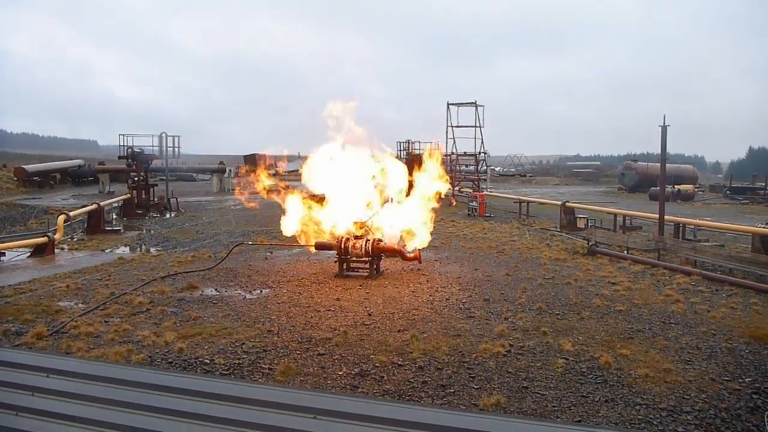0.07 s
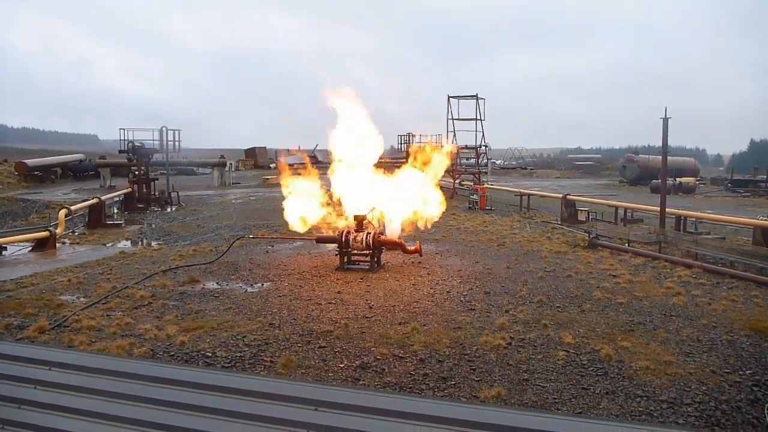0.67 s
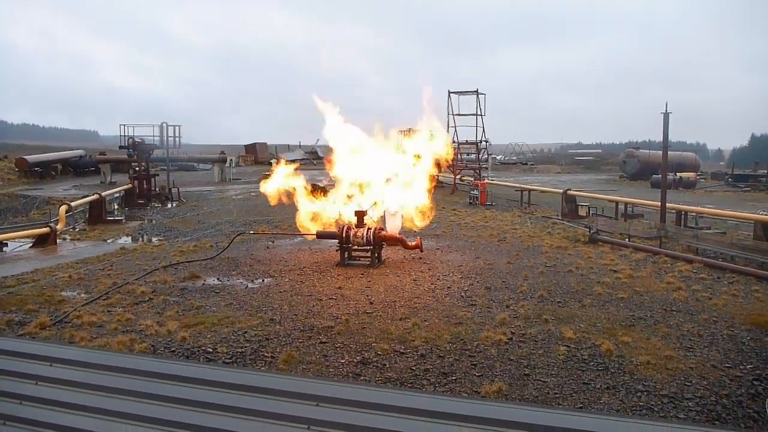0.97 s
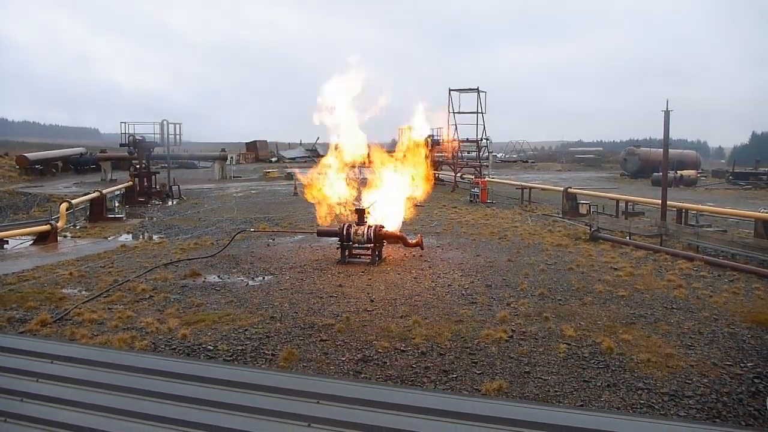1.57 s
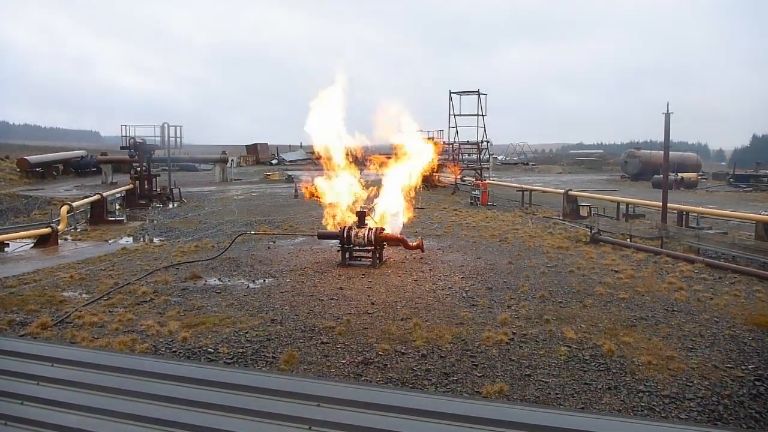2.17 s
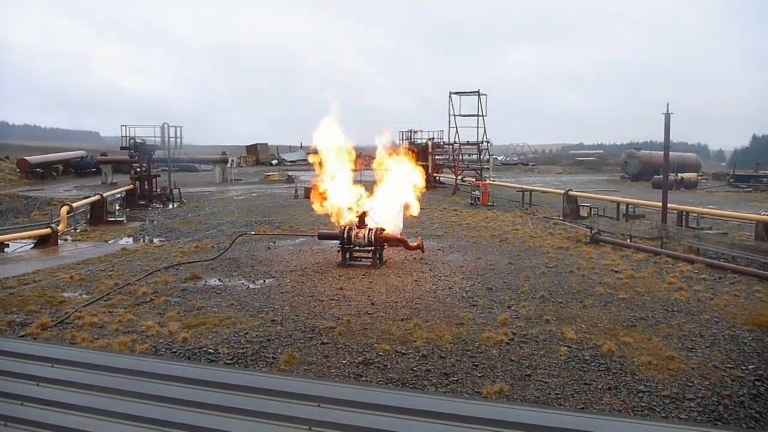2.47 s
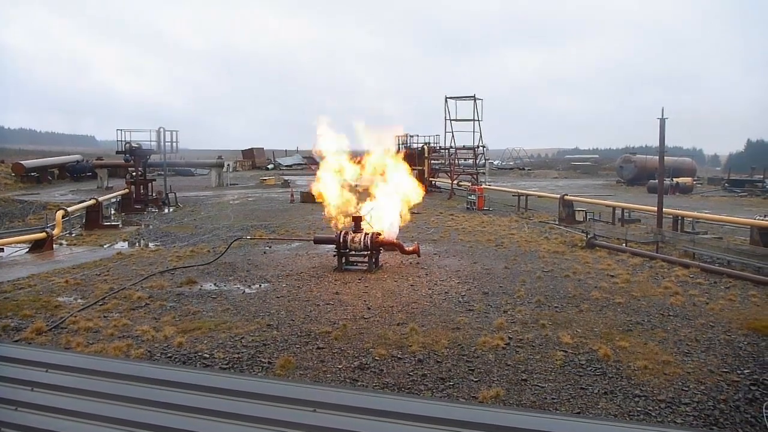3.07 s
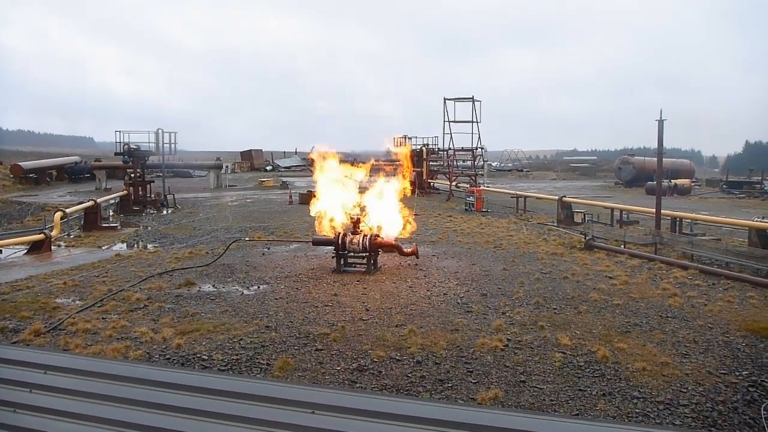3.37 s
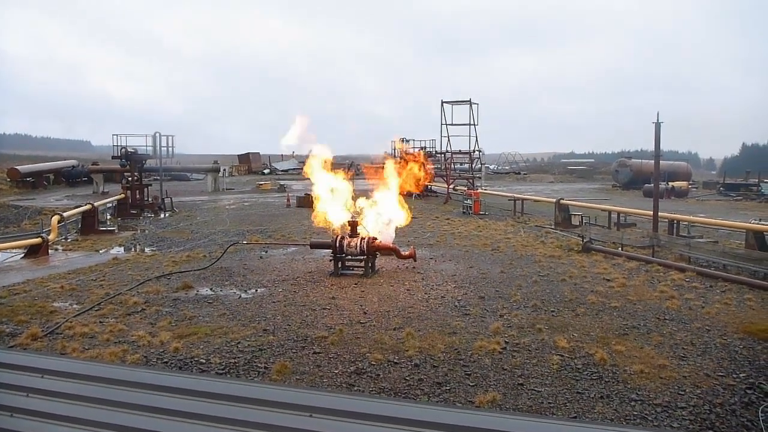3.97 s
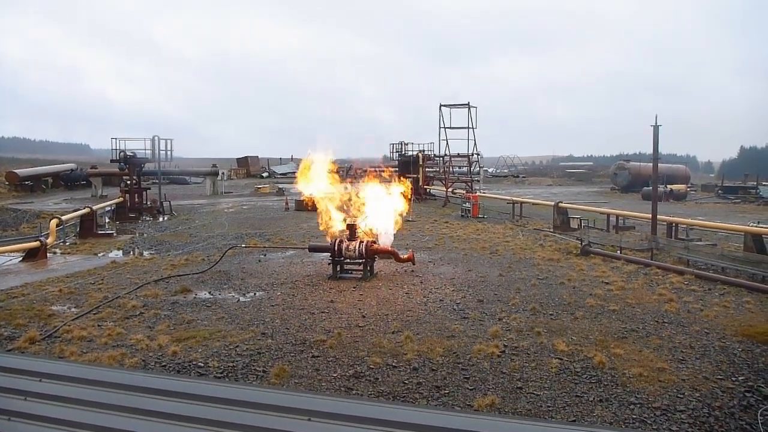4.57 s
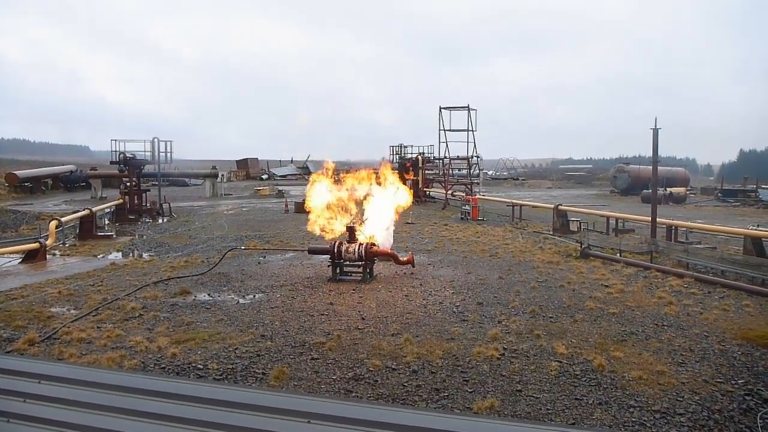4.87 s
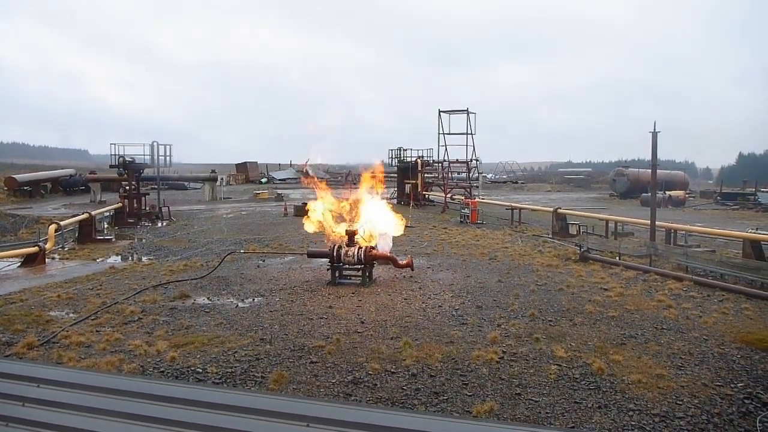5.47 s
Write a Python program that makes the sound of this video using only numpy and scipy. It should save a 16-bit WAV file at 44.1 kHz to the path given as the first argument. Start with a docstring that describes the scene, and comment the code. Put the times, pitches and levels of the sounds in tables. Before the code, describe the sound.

Burning gas jets from a pipe fitting with a fluttering roar and sputtering hiss that gradually weaken over a low rumble.

```python
"""Gas from a leaking pipe fitting hisses and burns in a tall flame in an open yard, over a low rumble.
The turbulent roar peaks in the first two seconds; gas pockets puff softly, the jet whistles briefly.
Then the pressure falls: the flame shrinks, its roar fades and sinks in pitch, the hiss weakens.
All is heard through the ringing housing of a small recorder that samples at 16 kHz."""
import sys
import numpy as np
from scipy import signal
from scipy.fft import rfft, irfft
from scipy.io import wavfile

SR = 44100
rng = np.random.default_rng(int(sys.argv[2]) if len(sys.argv) > 2 else 0)


def to_wav(s):
    """Save 16-bit WAV."""
    ch = np.atleast_2d(s).T  # columns
    pcm = np.round(np.clip(ch, -1, 1) * 32767)  # PCM
    wavfile.write(sys.argv[1], SR, pcm.astype(np.int16))


N = 242991
TIME_S = np.arange(N) / SR

# burn strength: (time [s], level [dB])
BURN = [(0.0, -35.5), (0.18, -30.5), (0.3, -29), (0.4, -33.5), (0.51, -29.5), (0.69, -33.5), (0.78, -28.5),
        (1.16, -29), (1.4, -33), (1.86, -30.5), (1.92, -34), (1.99, -30.5), (2.22, -35), (2.43, -41),
        (2.57, -37), (2.86, -42.5), (3.17, -40.5), (3.71, -46), (3.8, -42), (4.23, -43), (4.68, -48.5),
        (4.85, -45.5), (5.36, -46), (5.51, -51)]
# roar resonance: (time [s], centre [Hz])
ROAR_PITCH = [(0.0, 724), (0.47, 930), (0.66, 800), (0.79, 1000), (1.12, 790), (1.55, 845), (2.5, 700),
              (3.55, 710), (3.85, 616), (4.75, 760), (5.51, 700)]
# activity of the small flame tongues: (time [s], level [dB])
FLUTTER = [(0.0, -33.5), (0.43, -33), (0.66, -30), (0.73, -36), (0.97, -31), (1.46, -34.5), (1.5, -29),
           (1.75, -38.5), (1.97, -34.0), (2.87, -43.5), (3.34, -42.0), (3.69, -48), (3.87, -44),
           (4.15, -49.0), (4.21, -46), (5.25, -54), (5.34, -47.0), (5.51, -50)]
# gas flow at the leak: (time [s], level [dB])
FLOW = [(0.0, -35), (0.22, -34), (0.4, -36), (0.55, -33), (0.88, -33), (0.98, -31.5), (1.33, -34.5),
        (1.88, -36), (2.13, -36), (2.3, -38.5), (2.38, -41.5), (2.59, -38), (2.74, -42), (3.28, -41.7),
        (3.42, -44.5), (3.65, -45), (3.89, -41), (4.16, -44), (4.43, -44), (4.62, -46.5), (5.19, -46.8),
        (5.51, -46.5)]
# turbulence spectra: (frequency [Hz], density [dB])
ROAR_SPECTRUM = [(150, -52), (330, -22.5), (450, -2), (620, 1.5), (1000, -2), (1300, -8), (2000, -9),
                 (4000, -63)]
TONGUE_SPECTRUM = [(700, -76), (1100, -5.5), (1400, 2), (1550, 0.5), (1900, -5), (2400, -26.5), (4000, -35)]
RUSH_SPECTRUM = [(900, -3), (1700, -3), (2200, 2), (3500, 2), (4200, -1.5), (5200, -19), (7500, -39)]
HISS_SPECTRUM = [(2500, -36), (3800, -4), (4600, 2.5), (5100, 2), (6300, 0), (7000, -7), (7550, -24.5)]
RUMBLE_SPECTRUM = [(25, -49), (60, -31.5), (130, -15), (200, -8.5), (280, -3), (400, 0.5), (600, 1.5),
                   (1200, -58)]
# jet tones: (time [s], level [dB], pitch [Hz], 1/e half-width [s])
WHISTLES = [(0.63, -50, 2600, .02), (1.23, -43, 2630, .03), (1.413, -48, 2610, .008),
            (2.6, -60, 2600, .025), (2.785, -49, 3540, 0.011), (2.83, -47, 3500, .006),
            (4.72, -58.5, 5000, 0.07), (5.064, -59, 2600, .035), (5.223, -56, 5220, .02),
            (5.267, -54, 4320, .018), (5.372, -57, 2590, 0.056)]
# igniting gas pockets: (time [s], peak [dB], pitch [Hz], 1/e half-width [s])
PUFFS = [(.609, -42, 331, .003), (0.64, -41, 326, .003), (1.455, -42, 300, 0.0035),
         (4.125, -37.5, 335, 0.0027), (4.239, -32, 734, 0.0018), (4.705, -42, 300, 0.0028)]
# housing resonances and notches: (centre [Hz], width [Hz], gain [dB])
HOUSING = [(261, 44, 2.5), (615, 43, 4.5), (914, 324, 3), (1208, 203, -4), (1522, 55, 8.5), (1630, 119, 7),
           (2300, 260, -3), (2580, 108, 10.5), (2907, 91, -21), (3013, 134, 14), (3237, 63, 3.5),
           (3390, 78, -2), (3515, 136, 8), (3744, 83, 7.5), (4050, 52, 6.5), (4040, 106, -1),
           (4938, 276, 8), (5340, 96, -1.5), (5490, 230, 3.5), (5840, 290, -8), (6047, 336, 9.5),
           (6650, 180, -3.5)]


def flame(burn_db):
    """Unsteady burning: large eddies roar round a moving pitch, small tongues about an octave above."""
    eddies = turbulence(ROAR_SPECTRUM, flicker_db=2.04, flicker_hz=57)
    roar = from_db(-44.5 + burn_db) * gliding_resonance(eddies, curve(ROAR_PITCH), width_hz=377)
    flutter = turbulence(TONGUE_SPECTRUM, flicker_db=1.5, flicker_hz=15)
    tongues = from_db(-46 + swell_db(FLUTTER)) * flutter
    return roar + tongues


def jet(flow_db):
    """Gas tears out of the gap; its rush and finer hiss follow the flow and sputter together."""
    rush = from_db(-46 + 1.19 * flow_db) * turbulence(RUSH_SPECTRUM, flicker_db=2.0, flicker_hz=27)
    hiss = from_db(-47.5 + 0.95 * flow_db) * turbulence(HISS_SPECTRUM, flicker_db=1.7, flicker_hz=30)
    sputter_db = 0.73 * drift(rate_hz=47)
    return (rush + hiss) * from_db(sputter_db)


def whistles():
    """Vortices shed at the gap's edge lock briefly into a hoarse, wavering tone."""
    out = np.zeros(N)
    for time_s, level_db, pitch_hz, half_width_s in WHISTLES:
        wavering_hz = pitch_hz * np.exp(0.019 * drift(rate_hz=150))
        phase = 2 * np.pi * np.cumsum(wavering_hz) / SR
        out += from_db(level_db) * gaussian(time_s, half_width_s) * unit_rms(np.sin(phase))
    return out


def puffs():
    """Each gas pocket ignites with a dull pressure swing of two or three cycles."""
    out = np.zeros(N)
    for time_s, peak_db, pitch_hz, half_width_s in PUFFS:
        phase = 2 * np.pi * (pitch_hz * TIME_S + rng.random())
        out += from_db(peak_db) * gaussian(time_s, half_width_s) * np.sin(phase)
    return out


def plume(burn_db):
    """The column of hot gas rumbles, hardly weakening as the flame shrinks."""
    return from_db(-54 + 0.27 * burn_db) * turbulence(RUMBLE_SPECTRUM, flicker_db=0.5, flicker_hz=20)


def turbulence(spectrum, flicker_db, flicker_hz):
    """Coloured noise in three interleaved band sets that swell and sag apart as eddies pass; rms 1."""
    hz, density_db = np.transpose(spectrum)
    log_hz = np.log(np.fft.rfftfreq(N, 1 / SR) + 1)
    shape_db = np.interp(log_hz, np.log(hz), density_db, left=-np.inf, right=-np.inf)
    bins = rfft(rng.standard_normal(N)) * from_db(shape_db)
    band_set = np.floor(6 * log_hz) % 3
    out = np.zeros(N)
    for k in range(3):
        out += irfft(bins * (band_set == k), N) * from_db(flicker_db * drift(flicker_hz))
    return unit_rms(out)


def gliding_resonance(x, centre_hz, width_hz, block=128):
    """Band-pass retuned every block; rms 1."""
    radius = np.exp(-np.pi * width_hz / SR)
    state, out = np.zeros(2), np.zeros(N)
    for i in range(0, N, block):
        feedback = [1, -2 * radius * np.cos(2 * np.pi * centre_hz[i] / SR), radius * radius]
        out[i:i + block], state = signal.lfilter([1, 0, -1], feedback, x[i:i + block], zi=state)
    return unit_rms(out)


def drift(rate_hz, points=8192):
    """Random motion, rolled off above rate_hz; rms about 1."""
    hz = np.fft.rfftfreq(points, TIME_S[-1] / points)
    slow = irfft(rfft(rng.standard_normal(points)) / (1 + (hz / rate_hz) ** 2))
    return np.interp(TIME_S, np.linspace(0, TIME_S[-1], points), unit_rms(slow))


def housing(x):
    """Cavities before the microphone lift some narrow bands and swallow others."""
    for centre_hz, width_hz, gain_db in HOUSING:
        lift = from_db(gain_db / 2)
        damping = np.pi * width_hz / SR
        tuning = -2 * np.cos(2 * np.pi * centre_hz / SR)
        forward = [1 + damping * lift, tuning, 1 - damping * lift]
        feedback = [1 + damping / lift, tuning, 1 - damping / lift]
        x = signal.lfilter(forward, feedback, x)
    return x


def low_pass(x, edge_hz):
    """Steep elliptic low-pass."""
    return signal.sosfilt(signal.ellip(12, 0.1, 90, edge_hz, fs=SR, output="sos"), x)


def gaussian(time_s, half_width_s):
    """Bell envelope; peak 1."""
    return np.exp(-((TIME_S - time_s) / half_width_s) ** 2)


def swell_db(rows, middling_db=-40):
    """Level curve relative to a middling fire."""
    return curve(rows) - middling_db


def curve(rows):
    """Breakpoints interpolated to every sample."""
    return np.interp(TIME_S, *np.transpose(rows))


def from_db(db):
    """Decibels to gain."""
    return 10 ** (np.asarray(db) / 20)


def unit_rms(x):
    """Scale to rms 1."""
    return x / np.sqrt(np.mean(x ** 2) + 1e-20)


def scene():
    """The fire in open air; mono, no echo."""
    burn_db, flow_db = swell_db(BURN), swell_db(FLOW)
    return (flame(burn_db) + jet(flow_db) + whistles() + plume(burn_db) + puffs())[None]


def record(dry):
    """Housing, then sampling; linear interpolation mirrors the hiss faintly above 8 kHz."""
    recorder_hz = 16000
    band_limited = low_pass(housing(dry[0]), edge_hz=7600)
    samples = signal.resample(band_limited, round(N * recorder_hz / SR))
    fine_time_s = np.arange(2 * N) / (2 * SR)
    joined = np.interp(fine_time_s, np.arange(len(samples)) / recorder_hz, samples)
    return low_pass(signal.resample_poly(joined, 1, 2), edge_hz=15350)[None]


dry = scene()
out = record(dry)
to_wav(out)
```